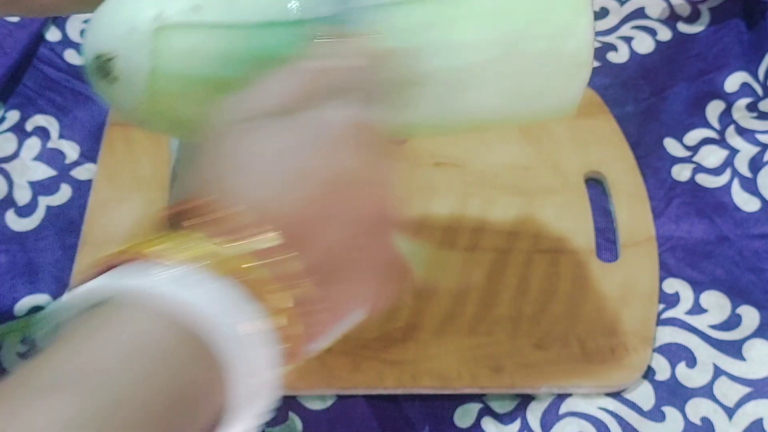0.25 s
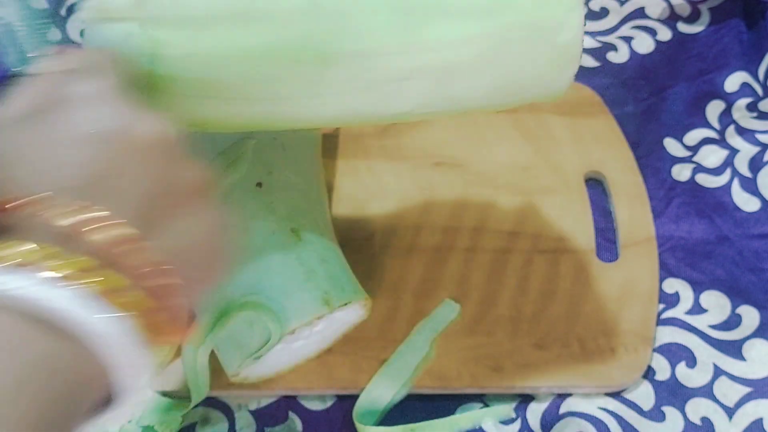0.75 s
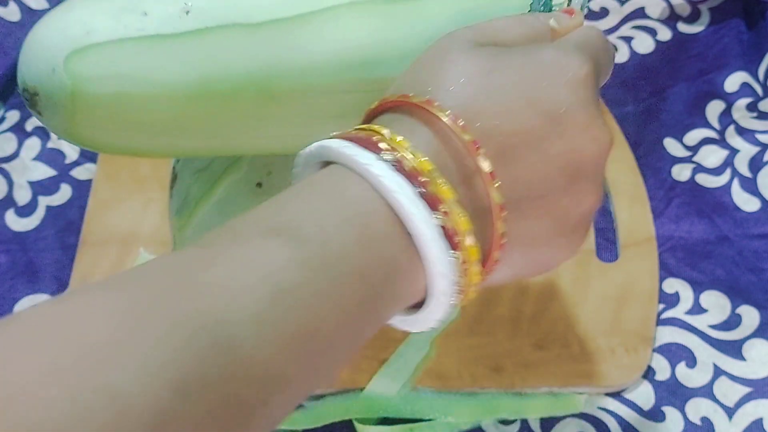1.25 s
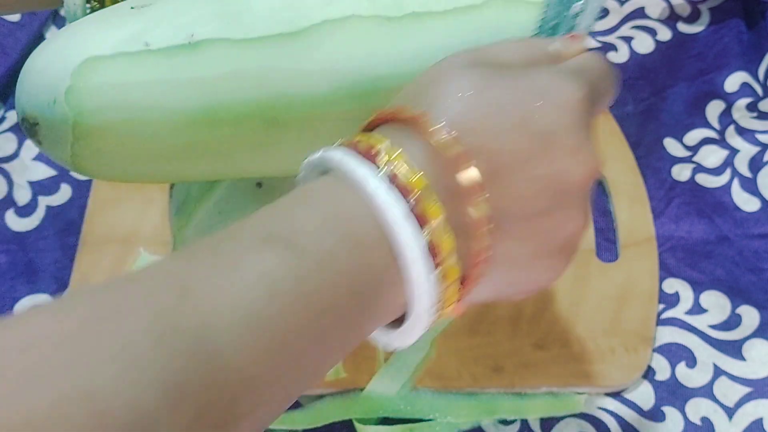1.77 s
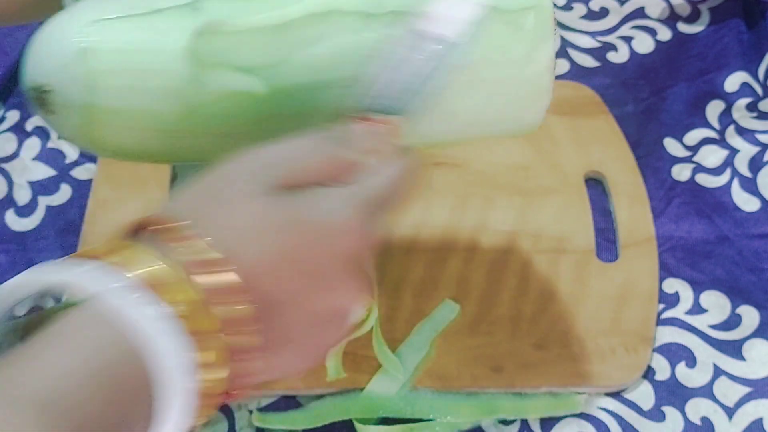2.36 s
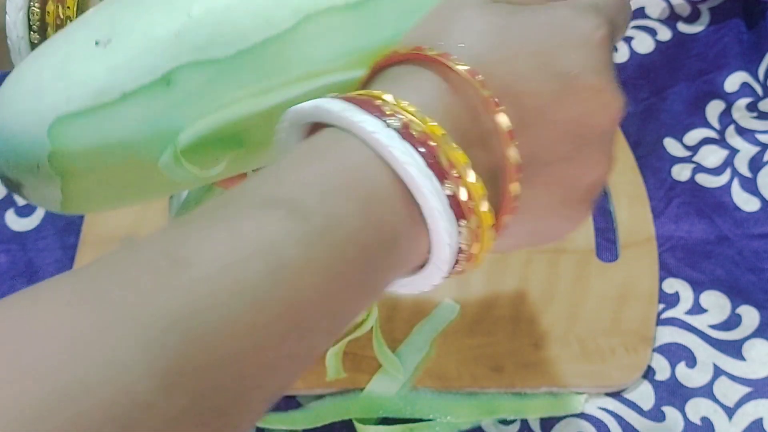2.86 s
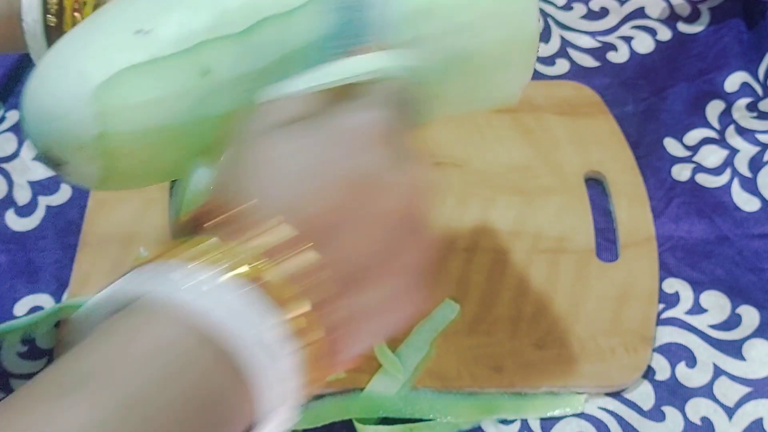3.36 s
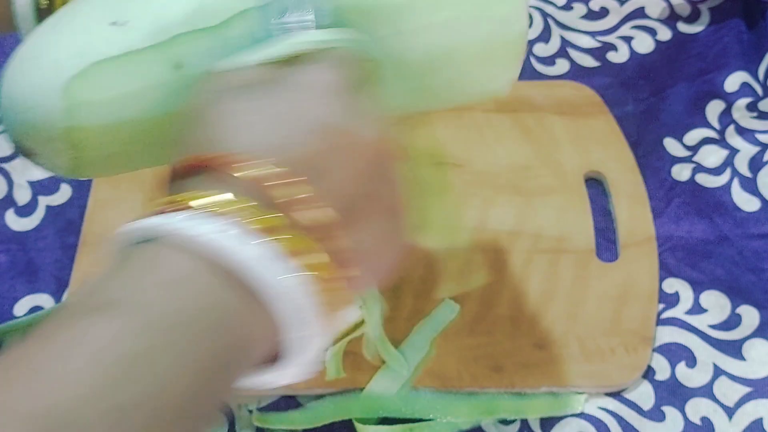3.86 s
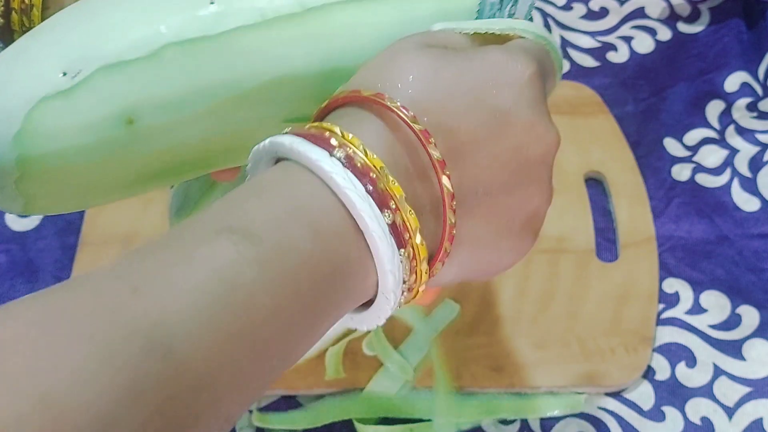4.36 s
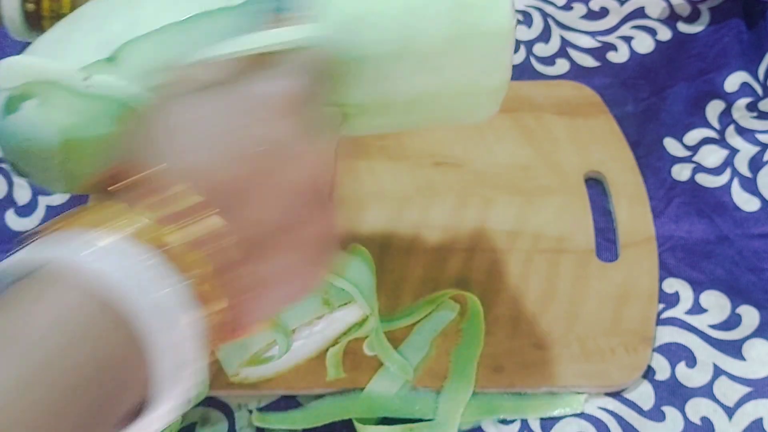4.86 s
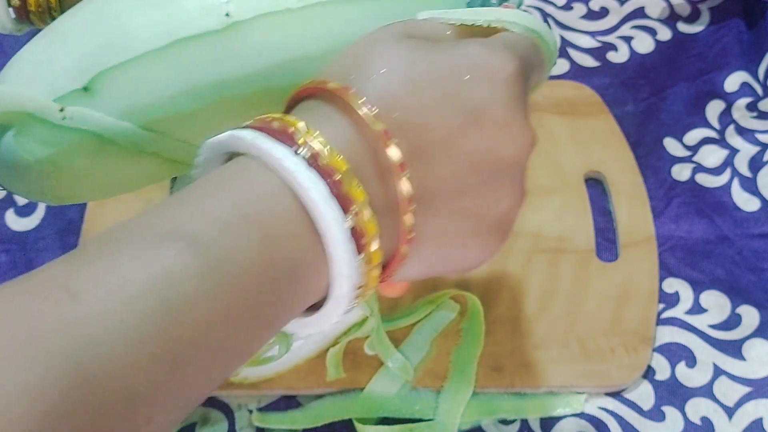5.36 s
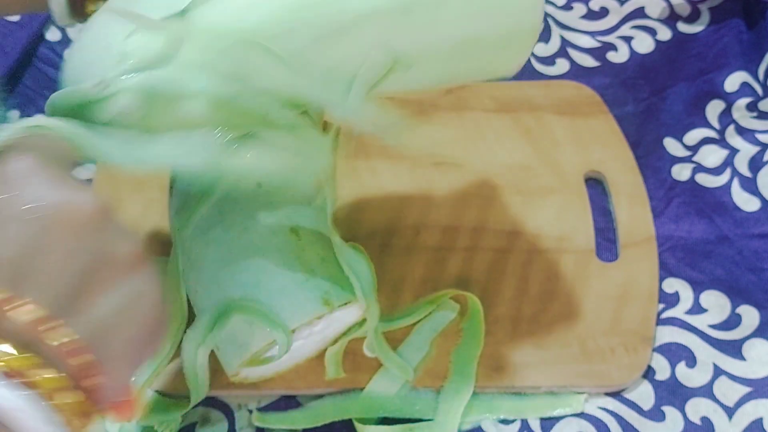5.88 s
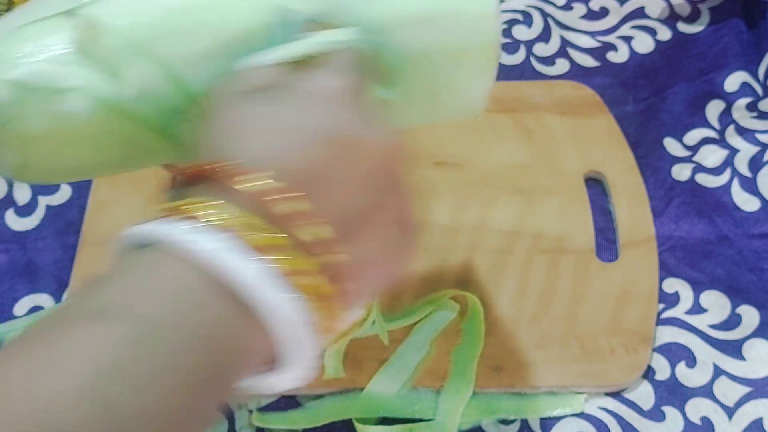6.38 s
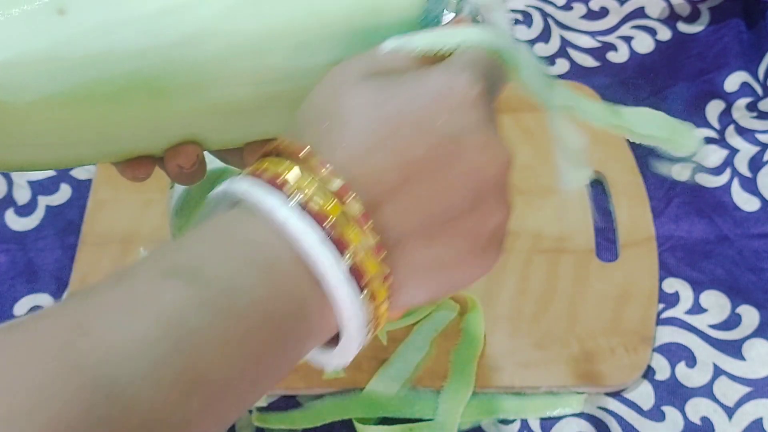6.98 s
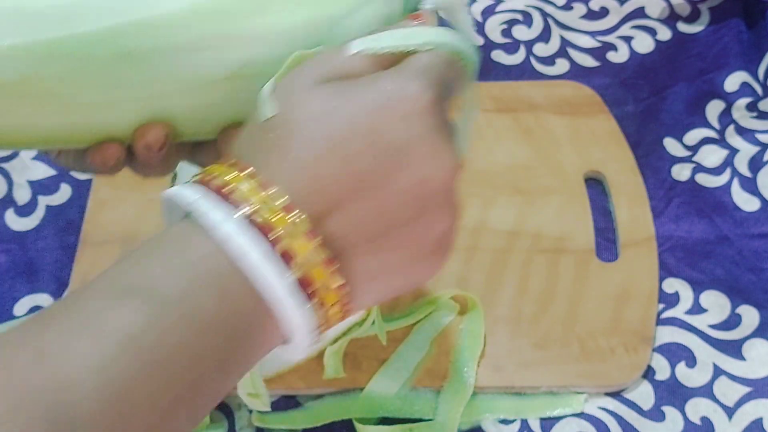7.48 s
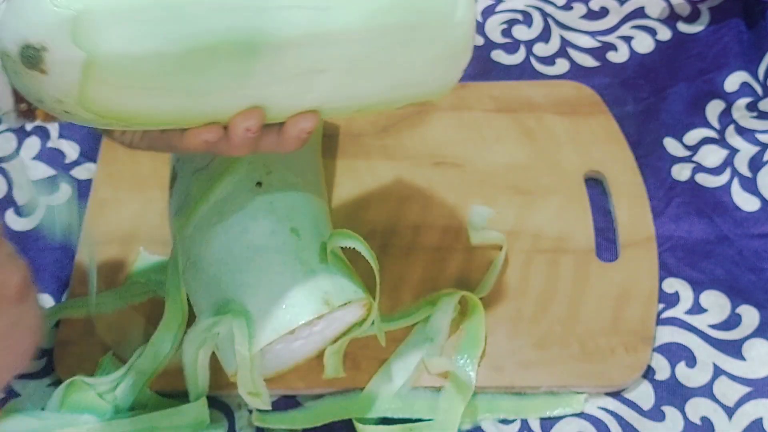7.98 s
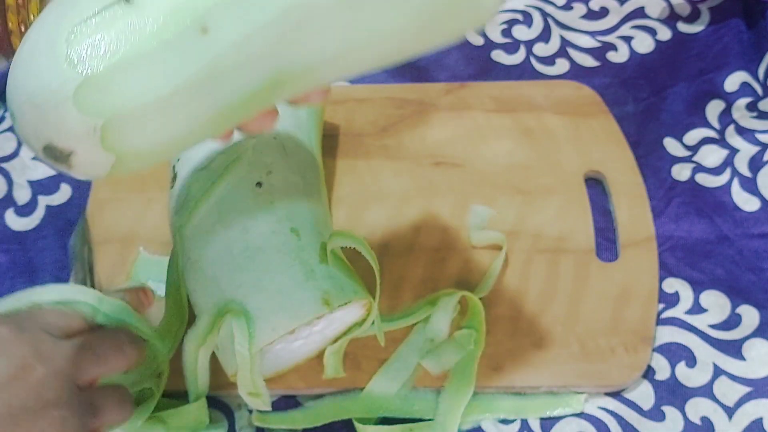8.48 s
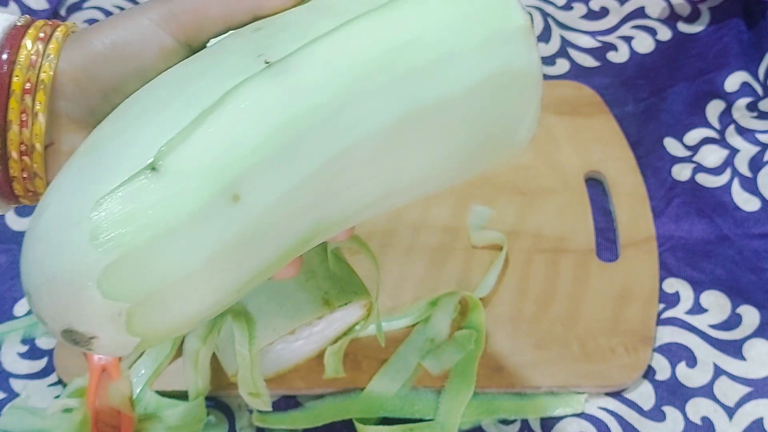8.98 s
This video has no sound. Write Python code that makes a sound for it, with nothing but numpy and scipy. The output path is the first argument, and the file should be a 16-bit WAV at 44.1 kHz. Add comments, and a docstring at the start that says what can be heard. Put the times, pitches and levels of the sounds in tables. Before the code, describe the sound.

A near stereo microphone, leaning left, catches eleven separate peeling strokes: early ones ring with a metallic blade scrape, later ones are a drier, brighter tearing hiss, and one midway stutters with a falling groan. Bright, brief bangle jingles answer them. Small peel ticks and soft hollow gourd knocks are scattered about. A departing vehicle hums early on; wooden thumps finish the scene in a short, hard room.

```python
"""Peeling strokes follow one another along a gourd: torn skin hisses as noise that also drives blade and flesh
resonances, and some strokes chatter as gliding sines. Bangles clink as the hand swings back: noisy impacts
excite their modes. Outside the small hard kitchen a vehicle drones away, as filtered noise and harmonics of
its firing rate; a whine and a faint tone pass in its wake. Late on, the gourd bumps the wooden board, whose
modes ring, and rocks it in low decaying sines. Air noise lies beneath; the treble ends at a steep limit."""
import sys
import numpy as np
from scipy import signal
from scipy.fft import rfft, irfft, next_fast_len
from scipy.io import wavfile
from scipy.ndimage import uniform_filter1d, map_coordinates

SR = 44100
rng = np.random.default_rng(int(sys.argv[2]) if len(sys.argv) > 2 else 0)


def store_wav(level_fs):
    """Save 16-bit WAV to argv[1]."""
    pcm = np.round(np.clip(np.atleast_2d(level_fs), -1, 1) * 32767)
    wavfile.write(sys.argv[1], SR, pcm.T.astype(np.int16))


N = 407484

# Resonances of the gourd, the first two low: centre_hz, width_hz, level_db
FLESH_MODES = [(483, 95, 8.5), (637, 92, -0.5), (749, 106, -2), (925, 64, -3), (1030, 66, -1),
               (1610, 1800, -15.5)]
# Coherence of the two ports, highest near 350 Hz: frequency_hz, likeness (0 to 1)
LIKENESS = [(60, 0.78), (140, 0.61), (350, 0.93), (700, 0.43), (2200, 0.39), (5000, 0.097), (15000, 0.047)]


def amp(db):
    """Decibel law: the amplitude gain of a level in dB."""
    return 10 ** (np.asarray(db) / 20)


def unit(x):
    """Normalisation: x at rms 1."""
    return x / np.sqrt(np.mean(x ** 2) + 1e-20)


def seconds():
    """Sampling: the time of each sample in s."""
    return np.arange(N) / SR


def along(points, hz):
    """Logarithmic frequency scale: interpolates (Hz, value) points."""
    f, v = np.transpose(points)
    return np.interp(np.log(hz + 1), np.log(f + 1), v)


def curve(points):
    """Linear interpolation: (s, value) points as one value per sample."""
    s, v = np.transpose(points)
    return np.interp(seconds(), s, v)


def wobble(rate):
    """Band-limited fluctuation: a smooth random curve with rate knots a second."""
    knots = rng.standard_normal(int(N * rate / SR) + 4)
    return map_coordinates(knots, [np.arange(N) * rate / SR])


def filtered(x, response):
    """Linear filtering: the spectrum of x times a response of frequency."""
    m = next_fast_len(N + SR // 2)
    return irfft(rfft(x, m) * response(np.fft.rfftfreq(m, 1 / SR)), m)[..., :N]


def colour(points):
    """Spectral envelope: the response through (Hz, dB) points."""
    return lambda hz: amp(along(points, hz))


def body(peaks):
    """Modal superposition: a sum of resonances with alternating sign."""
    def response(f):
        total = 0
        for k, (centre, width, db) in enumerate(peaks):
            damping = 1j * f * width
            total = total + (-1) ** k * amp(db) * damping / (centre * centre - f * f + damping)
        return total
    return response


def ports(pair, response):
    """Spatial coherence: unrelated signals mixed into two ports, most alike near 350 Hz, then falling
    towards the treble; their mean has rms 1."""
    # the left port hears more: frequency_hz, left_minus_right_db
    lean = [(40, 9), (150, 1), (700, 3.5), (2500, 6), (8000, 8), (15000, 6.5)]

    def mid_side(hz):
        turn = np.arccos(np.clip(along(LIKENESS, hz), -1, 1)) / 2
        return response(hz) * [np.cos(turn), np.sin(turn)]

    mid, side = filtered(pair, mid_side)
    both = np.array([mid + side, mid - side])
    both = filtered(both, lambda hz: amp(np.outer([.5, -.5], along(lean, hz))))
    return both / np.sqrt(np.mean(both.mean(axis=0) ** 2))


def placed(pair, side_gain, left_db, right_db):
    """Mid-side stereo: the second signal enters the two ports with opposite signs."""
    return amp([[left_db], [right_db]]) * (pair[0] + side_gain * pair[1] * [[1], [-1]])


def grit(spiky_db, rate, patchy_db=0):
    """Modulated noise: a pair whose level flutters and whose colour shifts in time-frequency patches."""
    pair = rng.standard_normal((2, N))
    if patchy_db:
        z = signal.stft(pair, nperseg=256)[2]
        field = uniform_filter1d(rng.standard_normal(z.shape[1:]), size=4, axis=0)
        field = uniform_filter1d(field, size=12, axis=1)
        pair = signal.istft(z * amp(patchy_db * unit(field)), nperseg=256)[1][:, :N]
    return pair * amp(spiky_db * wobble(rate))


def tone(hz, jitter, rate):
    """Frequency modulation: an unsteady sine of rms 1."""
    return np.sqrt(2) * np.sin(2 * np.pi * np.cumsum(hz * (1 + jitter * wobble(rate))) / SR)


def bursts(times, db, rise, t60, spiky_db, blow):
    """Impact excitation: a first blow and a decaying rough noise, with a second noise unrelated."""
    age = np.arange(SR // 4) / SR
    env, first = np.zeros((2, N + SR))
    for s, level, life in np.broadcast(times, db, t60):
        env[round(s * SR):][:len(age)] += amp(level - 60 * age / life) * (1 - np.exp(-age / rise))
        first[round((s + rise) * SR)] += blow * amp(level)
    rough = env[:N] * grit(spiky_db, rate=840, patchy_db=3.0)
    return rough + [[1], [0]] * first[:N]


def struck(force, peaks):
    """Forced vibration: a body driven by the force; white force of rms 1 gives rms 1."""
    hz = np.linspace(0, SR / 2, 4096)
    return filtered(force, body(peaks)) / np.sqrt(np.mean(np.abs(body(peaks)(hz)) ** 2))


def peeler():
    """Fracture noise: tearing skin hisses and drives resonances of the blade and the gourd."""
    # peeling strokes: bite_s, swell_s, hold_s, bite_db, peak_db, blade_re_drive_db,
    # blade_drift_db (over the stroke), low_flesh_re_drive_db, high_flesh_re_drive_db
    strokes = [(0.008, 0.086, 0.075, -47.5, -40.5, 5.5, -5, 3.5, -2),
               (0.628, 0.1, 0.054, -50, -38.5, 3.5, -2, -4.5, -3),
               (1.401, 0.096, 0.06, -42, -42, 0.5, 2.5, -3, -2),
               (2.039, 0.1, 0.11, -47, -41, 1, -1.5, -3, -3),
               (3.065, 0.14, 0.068, -54.5, -37.5, -11, 2, -0.5, -5.5),
               (3.894, 0.082, 0.061, -43.5, -41, -3, -11, -5, -4.5),
               (4.567, 0.079, 0.11, -45, -39, -8.5, -22, -4.5, -6),
               (5.707, 0.11, 0.072, -46.5, -42, -4.5, 2, -4.5, -2),
               (6.416, 0.095, 0.065, -42.5, -36, -18, -41, -8, -3.5),
               (7.08, 0.082, 0.097, -50.5, -39.5, -12.5, -34, -1.5, -2.5),
               (7.764, 0.076, 0.11, -40.5, -38, -18.5, -31, -8, -5)]
    # the blade only brushes the skin: start_s, drive_db
    grazes = [(1.294, -57.5), (8.348, -62.5)]
    # wet skin tearing: frequency_hz, relative_density_db
    hiss_spectrum = [(710, -22.5), (1200, -10), (2220, -8), (2810, -12), (4520, -5.5), (7220, -2.5),
                     (8500, -4.5), (11000, -38), (18700, -120)]
    # finest spray of the tear: frequency_hz, relative_density_db
    spray_spectrum = [(7000, -37.5), (9000, -9.5), (12000, -0.5), (15800, -5)]
    # blade resonances: centre_hz, width_hz, level_db
    blade_modes = [(1820, 880, -7.5), (1962, 94, 3.5), (2186, 105, 7), (2291, 83, 4.5)]
    # the arm shakes the table: frequency_hz, relative_density_db
    arm_spectrum = [(25, -22), (60, 4), (200, -13), (400, -14.5)]
    graze_blade_db, graze_flesh_db = -2, -1  # re drive

    brushes = [(s, 1e-3, 1e-3, db, db, graze_blade_db, 0, graze_flesh_db, graze_flesh_db) for s, db in grazes]
    drive, blade, low, high = np.zeros((4, N))
    for bite, swell, hold, bite_db, peak_db, blade_db, drift_db, low_db, high_db in strokes + brushes:
        db = stroke(bite, swell, hold, bite_db, peak_db)
        way = np.interp(seconds(), [bite, bite + swell + hold], [-.5, .5])  # along the gourd
        depth_db = db - db.max()  # the deeper the cut, the more blade and gourd sound
        drive += amp(db)
        blade += amp(db + blade_db + drift_db * way + 0.48 * depth_db)
        flesh = amp(db + 0.19 * depth_db)
        low += amp(low_db) * flesh
        high += amp(high_db) * flesh

    out = amp(-3.0) * drive * ports(grit(spiky_db=2.2, rate=250, patchy_db=3.5), colour(hiss_spectrum))
    out += amp(1.24) * drive * ports(grit(spiky_db=1.0, rate=680, patchy_db=4.0), colour(spray_spectrum))
    out += blade * ports(grit(spiky_db=1.0, rate=82, patchy_db=3.5), body(blade_modes))
    out += low * ports(grit(spiky_db=2.5, rate=60, patchy_db=3.5), body(FLESH_MODES[:2]))
    out += high * ports(grit(spiky_db=1.0, rate=150, patchy_db=2), body(FLESH_MODES[2:]))
    shake = unit(filtered(grit(spiky_db=11, rate=36), colour(arm_spectrum)))
    out += drive * amp([[-11], [-26]]) * shake
    out *= amp(1.2 * wobble(30))  # uneven skin under the edge
    return out + amp([[1.2], [-1.2]]) * chatter()


def stroke(bite, swell, hold, bite_db, peak_db):
    """Force envelope: the level in dB of one stroke through landing, swell, sagging hold and lift."""
    land_db_per_s, lift_db_per_s, sag_db_per_s = 430, 468.5, 14.5
    end, end_db = bite + swell + hold, peak_db - sag_db_per_s * hold
    return curve([(bite - 1, bite_db - land_db_per_s), (bite, bite_db), (bite + swell, peak_db),
                  (end, end_db), (end + 1, end_db - lift_db_per_s)])


def chatter():
    """Stick-slip friction: each bout of even slips is a sine that sets in fast, glides and weakens."""
    # bouts: start_s, length_s, first_slip_hz, last_slip_hz, level_db
    bouts = [(0.107, 0.032, 500, 470, -32), (0.733, 0.0095, 564, 562, -32), (0.761, 0.017, 649, 756, -33),
             (2.143, 0.029, 593, 488, -38), (3.202, 0.0225, 529.4, 422, -25), (3.226, 0.061, 480, 308, -30)]
    catch_s, fade_db_per_s = 0.0056, 171  # onset and release time; weakening
    t, out = seconds(), np.zeros(N)
    for s, length, first_hz, last_hz, db in bouts:
        edges = np.clip(np.minimum(t - s + catch_s, s + length + catch_s - t) / catch_s, 0, 1)
        level = amp(db - fade_db_per_s * np.clip(t - s, 0, 1))
        hz = np.interp(t, [s, s + length], [first_hz, last_hz])
        out += edges * level * tone(hz, jitter=0.0316, rate=56)
    return out


def bangles():
    """Modal excitation: each contact shakes ringing, lower, crowded and thin modes in its own mix."""
    # contacts: start_s, force_db, lower_re_force_db, crowded_re_force_db, rattle_t60_s, ring_re_force_db
    clinks = [(0.3675, -40.5, 3.5, 5.5, 0.047, -24), (0.3866, -24.5, -5.5, 0, 0.037, -19),
              (0.9997, -28.5, -8.5, -16.5, 0.026, -36), (1.0203, -28.5, -9.5, -8.5, 0.04, -18),
              (1.0276, -26.5, -9, 7.5, 0.014, -19.5), (1.641, -25.5, -2.5, -6, 0.013, -26),
              (1.778, -30.5, -12, 3, 0.04, -25), (1.7948, -27, -4, 2.5, 0.034, -21),
              (2.3694, -49, 11, -26, 0.012, -18), (2.5004, -22.5, -17, -12, 0.043, -12),
              (2.514, -27, -4.5, 4, 0.044, -20), (2.524, -28.5, -7, 7.5, 0.024, -18),
              (2.714, -36.5, -12, -10, 0.024, -13), (2.845, -51, 3, 6, 0.027, -14),
              (2.886, -42.5, -8.5, -8, 0.033, 2), (3.477, -36.5, -9, -29, 0.032, -10),
              (3.516, -29, -13.5, -13.5, 0.029, -11.5), (4.276, -29.5, -14, -18, 0.03, -16),
              (4.3069, -27, -13, -7, 0.027, -20), (4.3227, -46.5, 4, -5, 0.02, -14.5),
              (5.002, -35, -13, -13, 0.073, -6), (5.023, -33, -7, 1.5, 0.08, -17.5),
              (5.4092, -63, 12, -11, 0.016, -16.5), (5.4895, -35.5, -9.5, -8, 0.021, -15),
              (6.018, -54, 10, -9, 0.019, -17), (6.14, -36.5, -5, -4, 0.04, -6),
              (6.159, -31.5, -7.5, -8.5, 0.05, -8), (6.787, -23, 2, -12, 0.014, -22),
              (7.376, -61, 12, -14, 0.024, -16), (7.4254, -24.5, -12.5, -4.5, 0.024, -4.5),
              (7.515, -36, -1, 0, 0.11, -27), (8.089, -51.5, -1, -16, 0.018, 3.5),
              (8.1526, -64.5, 13, -13, 0.031, -10), (8.324, -52, 7, -1.5, 0.068, -23),
              (8.3467, -55, 14.5, 5, 0.028, -2), (8.4858, -45, -7, -5.5, .03, -16),
              (8.573, -49, 4, 7, 0.018, -27), (8.845, -39, -2, -2, 0.041, -14),
              (9.106, -31, 6.5, -3.5, 0.012, -7)]
    # ringing modes: centre_hz, width_hz, level_db
    ringing = [(9570, 280, 6.5), (15360, 720, -1)]
    # lower modes, the lowest first: centre_hz, width_hz, level_db
    lower_modes = [(1780, 370, -14), (5160, 2300, -6.5), (6110, 450, -1.5), (6730, 610, -6)]
    # crowded short modes: centre_hz, width_hz, level_db
    crowded = [(11500, 3200, 2.5), (12500, 600, 9.5), (16100, 2300, 8)]
    # thin modes that ring on: centre_hz, width_hz, level_db
    thin = [(5100, 130, -0.5), (9500, 54, 4), (15310, 44, -1)]
    thin_hz, lowest_db = 3300, -21.5  # small rings radiate little below thin_hz; lowest mode re the lower ones

    s, db, lower_db, crowded_db, t60, ring_db = np.transpose(clinks)
    run = touches(s)
    out = struck(run * bursts(s, db, rise=0.0005, t60=t60, spiky_db=0.5, blow=0.87), ringing)
    lower = run * bursts(s, db + lower_db, rise=0.00085, t60=t60, spiky_db=2.5, blow=1.9)
    out += struck(lower, lower_modes[1:])
    out += struck(run * bursts(s, db + crowded_db, rise=0.0006, t60=t60, spiky_db=4.0, blow=1.3), crowded)
    out += struck(bursts(s, db + ring_db, rise=0.00063, t60=0.04, spiky_db=4, blow=4.2), thin)
    out = filtered(out, lambda f: (1j * f / (thin_hz + 1j * f)) ** 4)
    out += amp(lowest_db) * struck(lower, lower_modes[:1])
    return placed(out, 0.96, left_db=3.0, right_db=-3.5)


def touches(times):
    """Contact bounce: each contact is a run of separate sharp touches at uneven gaps."""
    gap_s, life_s, scatter_db, between = 0.0042, 0.0015, 2.5, 0.47  # between: force gain left between touches
    draw = rng.standard_normal((len(times), 2, 12))
    gaps = gap_s * np.exp(draw[:, 0] / 2)
    at = times[:, None] + np.cumsum(gaps, axis=1) - gaps[:, :1]  # the first touch falls on the contact
    at = np.round(at * SR).astype(int)
    hits = np.bincount(at.ravel(), amp(scatter_db * draw[:, 1]).ravel(), minlength=N + SR)[:N]
    return between + signal.lfilter([1], [1, -np.exp(-1 / (life_s * SR))], hits)


def board():
    """Impact on a plate: bumps shake the wood, its hard edge and something glassy that rings along."""
    # blows: start_s, force_db, sharp_re_force_db, glassy_re_force_db
    knocks = [(6.742, -43.5, -3.5, -23), (8.147, -58.5, -3, -17), (8.326, -64, -3, -10),
              (8.589, -36, 2.5, -9.5), (8.722, -44, 12, -20), (8.77, -51, 10, -16), (8.867, -61.5, 5, -8)]
    # modes of the wood: centre_hz, width_hz, level_db
    wood = [(114, 34, 1.5), (215, 74, 5.5), (415, 85, 7), (497, 18.4, 4.5), (714, 84, -7.5),
            (1030, 210, -7.5)]
    # hard edge of the blow: centre_hz, width_hz, level_db
    sharp = [(1460, 340, 2), (4010, 860, 0), (6720, 950, 2), (12200, 6600, -6)]
    # something hard on the board: centre_hz, width_hz, level_db
    glassy = [(1580, 57, 3), (3076, 120, 6.5), (4400, 130, -9)]
    s, db, sharp_db, glassy_db = np.transpose(knocks)
    out = struck(bursts(s, db, rise=0.0015, t60=0.34, spiky_db=0, blow=20.0), wood)
    out += struck(bursts(s, db + sharp_db, rise=0.00069, t60=0.12, spiky_db=1.5, blow=3.2), sharp)
    out += struck(bursts(s, db + glassy_db, rise=0.00062, t60=0.46, spiky_db=3.5, blow=6.1), glassy)
    return placed(out, 1.1, left_db=2.5, right_db=-3)


def thuds():
    """Damped oscillation: the board's edge drops on the cloth, each time a low swing that dies at once."""
    # drops: start_s, level_db, pitch_hz
    drops = [(6.741, -30, 144), (6.771, -31.5, 125), (6.808, -33.5, 215), (8.638, -22, 91),
             (8.671, -20.5, 75.5), (8.733, -22.5, 74), (8.804, -18.5, 106), (8.839, -40, 75),
             (8.873, -30, 91)]
    t60_s, rise_s = 0.043, 0.0021
    out, age = np.zeros(N), np.arange(SR // 4) / SR
    for s, db, hz in drops:
        env = amp(db - 60 * age / t60_s) * (1 - np.exp(-age / rise_s))
        out[round(s * SR):][:len(age)] += env * np.sin(2 * np.pi * hz * age)
    return amp([[3], [-4]]) * out


def soft_knocks():
    """Impact on a soft body: small soft knocks sound the low modes of the gourd."""
    # knocks: start_s, force_db
    knocks = [(.09, -39), (1.289, -56), (2.52, -53), (2.75, -57), (7, -60.5), (7.068, -50.5), (7.652, -57),
              (7.736, -41.5)]
    s, db = np.transpose(knocks)
    force = bursts(s, db, rise=0.0016, t60=0.18, spiky_db=0, blow=18)
    return placed(struck(force, FLESH_MODES[:2]), 1.1, left_db=2.5, right_db=-3)


def snaps():
    """Broad, heavily damped resonance: small dry ticks of peel and fingers."""
    # ticks: start_s, level_db (all lowered together below)
    ticks = [(0.5642, -39), (0.5916, -45), (1.3643, -44), (3.8511, -40.5), (4.4892, -51), (4.8753, -50),
             (5.5289, -39), (6.0877, -51), (6.383, -34), (6.6952, -44), (6.8128, -43.5), (8.304, -51.5),
             (8.9688, -40)]
    # peel resonances: centre_hz, width_hz, level_db
    peel = [(6100, 2300, -0.5), (12500, 12000, 0)]
    s, db = np.transpose(ticks)
    force = bursts(s, db - 11, rise=0.0005, t60=0.04, spiky_db=5.5, blow=2.5)
    return placed(struck(force, peel), 1.1, left_db=2.5, right_db=-3)


def kitchen(x):
    """Reverberation: each frequency decays at its own speed; the random tail is redrawn every third of a second."""
    # decay time of the room: frequency_hz, t60_s
    decay = [(300, 0.39), (2000, 0.34), (4000, 0.45), (9000, 0.23), (16000, 0.24)]
    step, delay = SR // 3, 200  # samples
    out = np.zeros((2, N + 2 * SR))
    for at in range(0, N, step):
        hz, t, z = signal.stft(rng.standard_normal((2, SR // 2)), SR, nperseg=256)
        alike = np.clip(along(LIKENESS, hz), 0, 1)[:, None]
        z[1] = alike * z[0] + np.sqrt(1 - alike ** 2) * z[1]
        fall = amp(-60 * t / along(decay, hz)[:, None])
        tail = signal.istft(z * fall, SR, nperseg=256)[1]
        wet = signal.fftconvolve(x[:, at:at + step], tail / np.linalg.norm(tail[0]), axes=1)
        out[:, at + delay:][:, :wet.shape[1]] += wet
    return out[:, :N]


def street():
    """Superposition: a vehicle moving off and two faint tones."""
    return engine() + rumble() + tyres() + whine() + hoot()


def engine():
    """Harmonic series: wavering multiples of a slowing firing rate through the pipe, over a noisy drone."""
    # engine loudness: time_s, level_db
    loudness = [(0, -45.5), (.42, -57), (.9, -47.5), (1.5, -44.5), (2.1, -52), (2.6, -56.5), (3.25, -63.5),
                (3.55, -78), (3.9, -70.5), (5.3, -73.5), (9.24, -72)]
    # exhaust and window: frequency_hz, gain_db
    pipe = [(60, -18.5), (130, -7), (160, 4), (185, -8.5), (230, -48.5)]
    # resonance of the drone: centre_hz, width_hz, level_db
    drone_mode = [(157.8, 22, 0)]
    firing_hz, slows_hz_per_s, gone_s = 22.07, 0.65, 5.54  # firing rate at the start, its fall, last heard
    drone_db, firing_db = -3, 2.5  # re engine loudness

    t, engine_db = seconds(), curve(loudness)
    hz = firing_hz - slows_hz_per_s * t
    turns = np.cumsum(hz * (1 + 0.00632 * wobble(4.71))) / SR
    lines = np.zeros(N)
    for k in range(3, 11):
        level = amp(along(pipe, k * hz) + 2.5 * wobble(3.77))
        lines += level * np.sin(2 * np.pi * (k * turns + rng.random()))
    drone = unit(filtered(rng.standard_normal(N), lambda f: body(drone_mode)(f) ** 2))
    out = amp(engine_db + drone_db) * drone
    return out + amp(engine_db + firing_db) * np.clip(gone_s - t, 0, 1) * unit(lines)


def rumble():
    """Broadband noise: the road noise fades into the town's."""
    # road noise: frequency_hz, relative_density_db
    road = [(20, -56), (40, -11.5), (124, -10), (162, -7.5), (216, -13), (383, -16.5), (634, -20),
            (1050, -25), (1400, -31.5), (1820, -68), (3080, -120)]
    near_db, fade_db_per_s, far_db = -50.5, 5.5, -91
    level = amp(near_db - fade_db_per_s * seconds()) + amp(far_db)
    return level * ports(grit(spiky_db=1.5, rate=8), colour(road))


def tyres():
    """Band-pass noise: a narrow tyre band that fades steadily."""
    # tyre band: centre_hz, width_hz, level_db
    band = [(1800, 210, 0)]
    start_db, fade_db_per_s = -61.5, 7.5
    noise = ports(rng.standard_normal((2, N)), lambda f: body(band)(f) ** 2)
    return amp(start_db - fade_db_per_s * seconds()) * noise


def whine():
    """Random frequency modulation: a distant sinking whine made hissy by fast jitter."""
    start_s, start_hz, sinks_hz_per_s = 2.35, 4840, 400
    left_db, right_db, rise_s, life_s = -64.5, -59.5, 0.21, 0.71
    age = np.clip(seconds() - start_s, 0, 3)
    hz = start_hz - sinks_hz_per_s * age
    pair = np.array([tone(hz, jitter=0.21, rate=800), tone(hz, jitter=0.092, rate=1200)])
    env = (1 - np.exp(-age / rise_s)) * np.exp(-(age / life_s) ** 2 / 2)
    return amp([[left_db], [right_db]]) * env * pair


def hoot():
    """Exponential decay: a faint tone of slightly unsteady pitch sets in and fades."""
    start_s, pitch_hz, level_db, fade_db_per_s, rise_s = 3.47, 537, -62, 63, 0.037
    age = np.clip(seconds() - start_s, 0, None)
    env = np.clip(age / rise_s, 0, 1) * amp(level_db - fade_db_per_s * age)
    return env * tone(pitch_hz, jitter=0.0106, rate=13)


def still_air():
    """Background noise: the kitchen and the microphone, gently fluctuating."""
    # noise spectrum: frequency_hz, relative_density_db
    floor = [(20, -10), (60, 1.5), (220, -7), (450, -9.5), (680, -10.5), (860, -7.5), (1100, -24),
             (1400, -25), (2500, -18.5), (6000, -18.5), (15800, -17.5)]
    return amp(-65.5) * ports(grit(spiky_db=2, rate=4, patchy_db=2.5), colour(floor))


def scene():
    """Superposition: near sources with their room, the street and the still air."""
    clinks = bangles()
    near = peeler() + board() + thuds() + soft_knocks() + snaps()
    room = kitchen(amp(-4.5) * clinks + amp(-9.5) * near)
    return clinks + near + room + street() + still_air()


def record(dry):
    """Band limitation: treble colour, then a steep upper band limit."""
    # a dip of the microphone port: frequency_hz, gain_db
    port_dip = [(7500, 1), (8100, -7), (9100, -5.5), (9600, -2.5)]
    # steep upper band limit: frequency_hz, gain_db
    band_limit = [(15700, 0), (16000, -26)]
    top_hz = 16980  # nothing is kept from here up
    return filtered(dry, lambda hz: amp(along(port_dip, hz) + along(band_limit, hz)) * (hz < top_hz))


dry = scene()
out = record(dry)
store_wav(out)
```